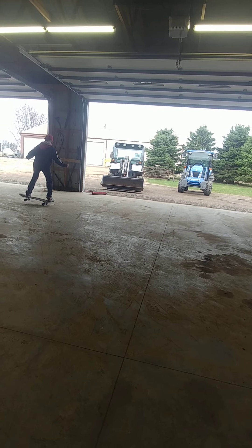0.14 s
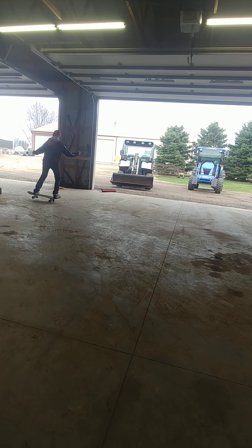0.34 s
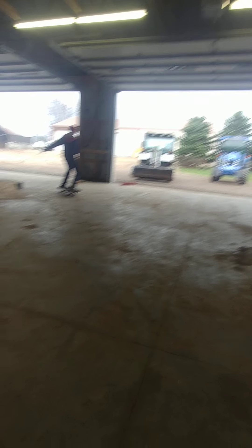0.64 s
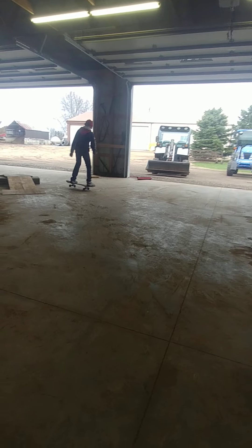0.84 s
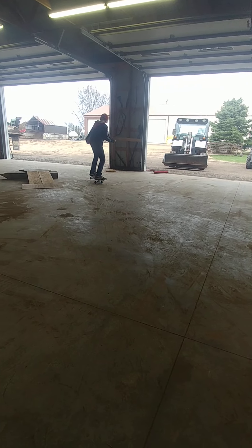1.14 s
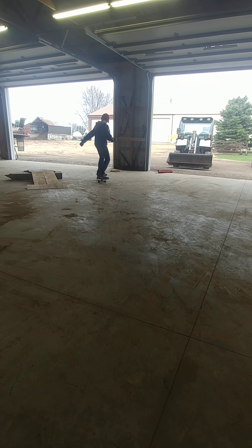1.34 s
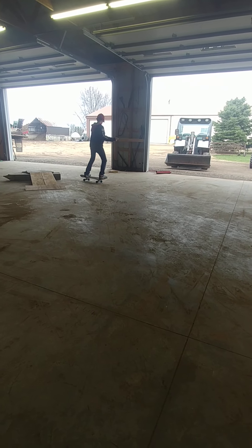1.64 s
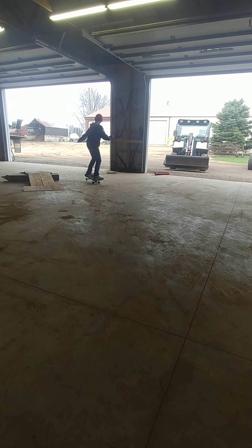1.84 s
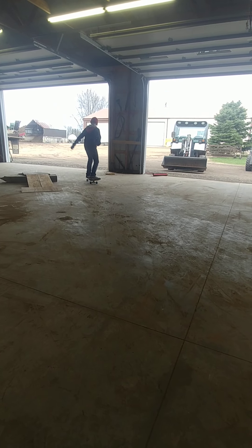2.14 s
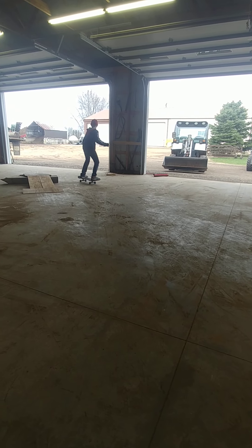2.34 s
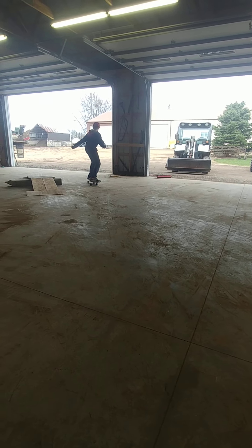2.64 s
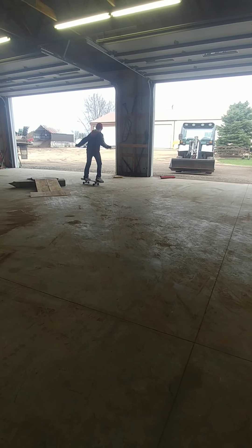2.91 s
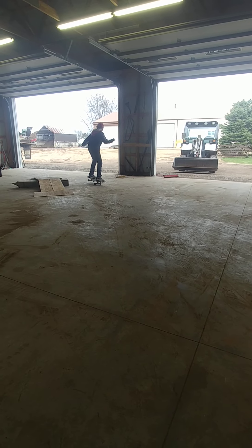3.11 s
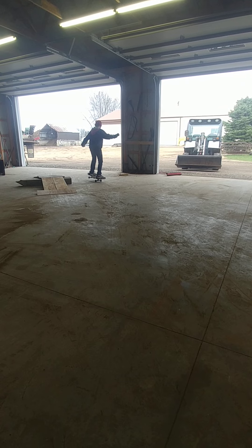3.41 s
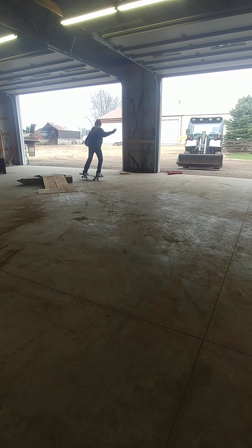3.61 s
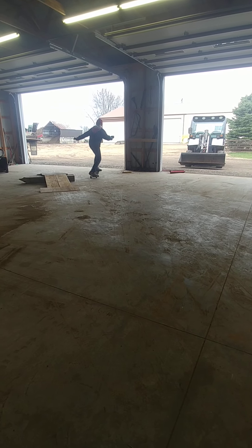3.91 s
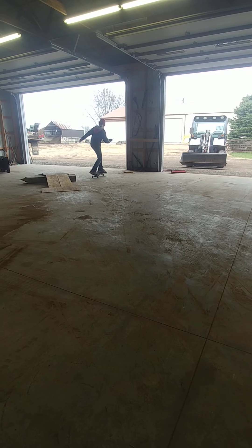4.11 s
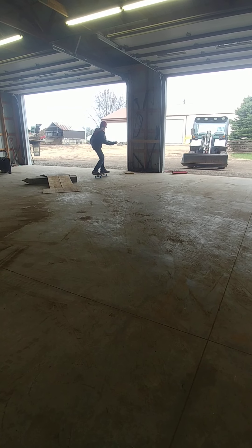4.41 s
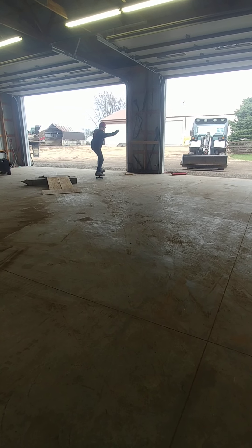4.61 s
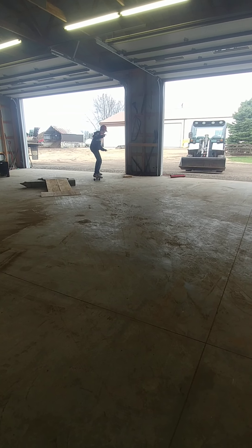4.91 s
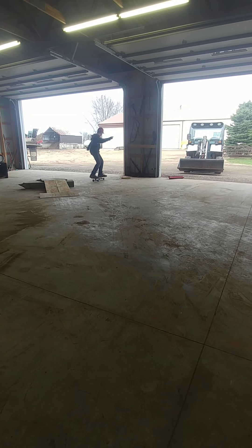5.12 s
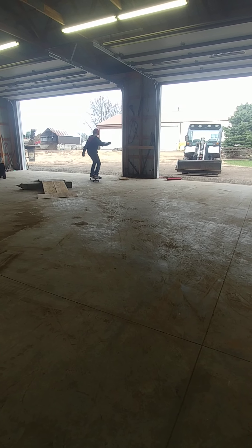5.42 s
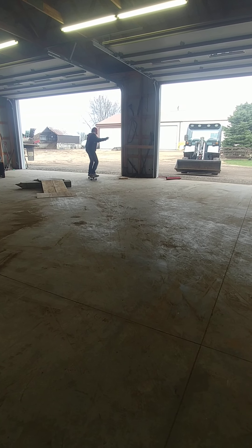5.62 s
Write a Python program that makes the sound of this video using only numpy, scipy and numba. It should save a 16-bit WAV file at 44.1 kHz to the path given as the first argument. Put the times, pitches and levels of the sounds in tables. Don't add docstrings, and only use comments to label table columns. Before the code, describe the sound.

Sharp, boomy skateboard landings on a concrete slab repeat fairly steadily, varying in force, some preceded by a light wheel scuff. Every knock bounces between floor and roof of a big shed and dies away in under a second. Gritty rolling and thin, high bearing squeaks appear mid-way; a pause follows the landing at 3.6 seconds, then looser knocks to the end. Distant phone stereo, slightly louder and brighter on the left, with soft hiss and low outdoor drone.

```python
import sys
import numpy as np
from scipy import signal
from scipy.fft import rfft, irfft, next_fast_len
from scipy.io import wavfile
from scipy.ndimage import uniform_filter1d
from numba import njit

SR = 44100
rng = np.random.default_rng(int(sys.argv[2]) if len(sys.argv) > 2 else 0)


def gain_from_db(level_db):
    decades = np.asarray(level_db, float) / 20
    return 10 ** decades


def store_wav(level_fs):
    pcm = np.round(np.clip(np.atleast_2d(level_fs), -1, 1) * 32767)
    wavfile.write(sys.argv[1], SR, pcm.T.astype(np.int16))


N = 253575
GRID_HZ = np.arange(2049) * SR / 4096 + 1


def shape_db(points):
    hz, db = np.transpose(points)
    return np.interp(np.log(GRID_HZ), np.log(hz), db)


def causal(gain):
    cepstrum = irfft(np.log(gain))
    cepstrum[1:2048] *= 2
    cepstrum[2049:] = 0
    return irfft(np.exp(rfft(cepstrum)))


def colour(x, points):
    return signal.fftconvolve(x, causal(gain_from_db(shape_db(points))))[:len(x)]


def unit(x):
    return x / np.sqrt(np.sum(x ** 2))


def noise(points):
    return unit(colour(rng.standard_normal(N), points)) * np.sqrt(N)


def curve(rows):
    return np.interp(np.arange(N) / SR, *np.transpose(rows))


def walk(rate_hz):
    hold = int(SR / rate_hz)
    steps = np.repeat(rng.standard_normal(N // hold + 1), hold)
    return 1.3 * uniform_filter1d(uniform_filter1d(steps, hold), hold)[:N]


def law(rule, *causes):
    return rule[0] + np.dot(rule[1:], causes)


def shift(modes, by_db):
    return [(hz, db + by_db, t60) for hz, db, t60 in modes]


def ring(modes):
    t = np.arange(4096) / SR
    sizes = gain_from_db(1.5 * rng.standard_normal(len(modes)))
    power = 0
    for size, (hz, db, t60) in zip(sizes, modes):
        tone = np.sin(2 * np.pi * hz * t) * gain_from_db(-60 * t / t60)
        power = power + abs(rfft(size * gain_from_db(db) * tone)) ** 2
    return power / power.mean()


RATTLE = [(17, .6), (29, .6), (47, .5)]


def rattle(x):
    for lag, gain in RATTLE:
        taps = np.r_[1, np.zeros(lag - 1), -gain]
        x = signal.lfilter(taps[::-1], taps, x)
    return x


# (frequency [Hz], level [dB], t60 [s])
SLAB = [(246, -0.5, 0.038), (313, 0, 0.049)]
# (frequency [Hz], t60 [s])
BOOM_MODE = (142, 0.076)
# (frequency [Hz], level [dB], t60 [s])
DECK_LOW = [(424, -23.5, 0.042), (524.7, 5, 0.022)]
DECK_HIGH = [(988, 2.8, 0.012), (1210, 3.8, 0.0082)]
# (frequency [Hz], level [dB], t60 [s])
TRUCKS = [(1480, 0, .014), (1890, 0, .014), (2220, -3, .012)]
TRUCKS_HIGH = [(2800, 2, .007), (3480, -2, .011), (4200, -5, .006)]
# (frequency [Hz], level [dB])
CLICK = [(800, -34), (2500, 3.5), (5000, 2), (7000, -2.5), (14000, 2)]
# (time [s], deck pitch [Hz], damping of the main note, so stronger side notes [dB])
FOOT = [(0, 835, -9.2), (.29, 670, 3), (.64, 812, -5), (.98, 812, -4.5), (1.291, 715, -10), (1.7, 796, 2),
        (2.0, 796, 4), (2.35, 760, -4), (2.65, 825, 1), (3.26, 855, -1), (3.6, 817, 1), (4.259, 838, 2.5),
        (4.8, 769, -3), (5.12, 780, -9), (5.47, 768, 1)]
# (level at weight 0 [dB], per weight [dB/dB], per time [dB/s])
BOOM_LAW = (4.5, 0.64, -3)
LOW_LAW = (5.24, 0.41, -2.51)
# (level [dB], per time [dB/s])
HIGH_LAW = (-7.5, 1.46)
# (level at slack 0 [dB], per slack [dB/dB], per time [dB/s])
UPPER_LAW = (-9.5, 1.1, 0.63)


def blow(s, deck_db, weight_db, slack_db, hard_db):
    when, pitch, damping = np.transpose(FOOT)
    deck_hz, damp_db = np.interp(s, when, pitch), np.interp(s, when, damping)
    boom_db = law(BOOM_LAW, weight_db, s)
    low_db = law(LOW_LAW, weight_db, s) + damp_db
    high_db = law(HIGH_LAW, s) + damp_db
    upper_db = min(law(UPPER_LAW, slack_db, s), 0)

    boom_hz, boom_t60 = BOOM_MODE
    slab_modes = SLAB + [(boom_hz, boom_db, boom_t60)]
    deck_modes = shift(DECK_LOW, low_db) + [(deck_hz, 0, .026)] + shift(DECK_HIGH, high_db)
    truck_modes = TRUCKS + shift(TRUCKS_HIGH, upper_db)

    slab_shape = shape_db([(50, -16.0), (110, -1.5), (400, -0.5), (900, -19.0)])
    deck_shape = shape_db([(120, -34), (380, -0.5), (1400, 6.0), (3000, -7.0)])
    truck_shape = shape_db([(400, -12), (1300, -1), (4500, -0.5), (8000, -22.5)])

    thump = ring(slab_modes) * gain_from_db(2 * slab_shape)
    deck = ring(deck_modes) * gain_from_db(2 * deck_shape)
    trucks = ring(truck_modes) * gain_from_db(2 * truck_shape)
    click = gain_from_db(2 * shape_db(CLICK))
    power = gain_from_db(2 * (deck_db + weight_db) - 7.0) * thump
    power += gain_from_db(2 * deck_db - 8.5) * deck
    power += gain_from_db(2 * (deck_db + slack_db) - 10.5) * trucks
    power += gain_from_db(2 * (deck_db + hard_db) + 11.5) * click
    return rattle(causal(np.sqrt(power)))


# (time [s], force [dB], rider's weight on the slab [dB], truck slack [dB], wheel hardness [dB])
LANDINGS = [(-.04, -30, -1.5, 5.5, -13.5), (0.287, -16.5, 5.5, -11.5, -16), (0.634, -14, -6, -15, -22.5),
            (0.65, -20.5, -3, -9, -23), (0.976, -21, -0.5, 2, -6.5), (1.288, -8.5, -13.5, 0, -19.5),
            (1.696, -16, -1.5, 2, -14), (1.998, -18, -9.5, 1, -25.5), (2.007, -16.5, -6.2, 8, -10),
            (2.346, -25, -1, -3, -15.5), (2.65, -17.5, -1.2, 3.5, -17), (2.987, -32.5, 2, -4, -11),
            (3.261, -21.5, -4, 0, -17.5), (3.62, -16, -4, 1, -4.5), (4.182, -39.5, -8, 1.3, -20),
            (4.256, -34.5, -4, -4.5, -31), (4.796, -15.5, -4.5, 2.5, -10), (5.119, -35.5, -3, 10, -9.5),
            (5.468, -25.5, -2.5, -4.5, -12.5)]
# (level at hardness 0 [dB], per hardness [dB/dB])
DIRECT_LAW = (29, .07)


def landings():
    return [(row[0], blow(*row), law(DIRECT_LAW, row[-1])) for row in LANDINGS]


def arrival():
    t = np.arange(256) / SR
    soft = np.exp(-2 * np.pi * 3000 * t)
    grit = np.diff(rng.standard_normal(len(t) + 1)) * np.exp(-t / .001)
    return soft / soft.sum() + gain_from_db(-2.5) * unit(grit)


# (centre [Hz], decay [dB/s], steepening [dB/s^2], left-right likeness [0-1])
SHED = [(91.5, 98, 14.5, 0.94), (183, 105, 19, 0.99), (350, 77.5, 24, 0.82), (700, 55.5, 62.5, 0),
        (1448, 73.5, 64.5, 0.16), (2800, 66, 102, 0.3), (5900, 81, 123.5, 0), (8900, 128.5, 106, 0.06),
        (13000, 197.5, 51.5, .3)]


def shed_bands(size):
    spectra = rfft(rng.standard_normal((2, size)))
    where = np.log(np.arange(spectra.shape[1]) * SR / size + 1)
    centres = np.log(np.array(SHED)[:, 0])
    bands = []
    for k, (hz, _, _, likeness) in enumerate(SHED):
        band_gain = np.interp(where, centres, np.arange(len(SHED)) == k)
        left, other = irfft(spectra * band_gain, size)
        alike = np.clip(likeness, 0, 1)
        late = np.roll(left, 22 * (hz > 500))
        bands.append([left, alike * late + np.sqrt(1 - alike ** 2) * other])
    return np.array(bands)


# (delay [s], level [dB], left lead [s])
ARRIVALS = [(.004, 12, .0005), (.0085, 14, .0003), (.0135, 19, 0), (.0265, 21, -.0002), (.044, 18, .0002)]
FLOOR_MIRROR = np.array([1, 0, 0, 0, 0, 0, .85]) / 1.85


def shed(strikes):
    size, lead = int(.9 * SR), SR // 10
    bands = shed_bands(size=next_fast_len(N + 2 * size))
    t = np.arange(size) / SR
    _, decay, steepening, _ = np.transpose(SHED)
    build_up = 1 - np.exp(-(t / .012) ** 2)
    fall = gain_from_db(-np.outer(decay, t) - np.outer(steepening, t ** 2)) * build_up
    bounces = [(k * .0176, 24.5 - (k - 1) * 3.5, .0005) for k in range(1, 7)]
    out = np.zeros((2, N + lead + 2 * size))
    for s, sound, direct_db in strikes:
        i = int(s * SR) + lead
        reply = np.einsum("bt,bct->ct", fall, bands[:, :, i:i + size])
        direct = (.00051, direct_db, .00055)
        for delay, db, left_lead in [direct] + ARRIVALS + bounces:
            echo = gain_from_db(db) * (arrival() if delay > .001 else FLOOR_MIRROR)
            for side, lag in enumerate([.001 - left_lead, .001]):
                j = int((delay + lag) * SR)
                reply[side, j:j + len(echo)] += echo
        heard = signal.fftconvolve(reply, sound[None], axes=1)
        out[:, i:i + heard.shape[1]] += heard
    start = lead + 40
    return out[:, start:start + N]


# (time [s], level [dB])
RUMBLE = [(0, -57), (1, -51), (2, -49.5), (3, -51.5), (4, -55), (4.5, -57.5), (5, -52), (5.75, -56)]
# (frequency [Hz], level [dB])
RUMBLE_SHAPE = [(25, -33.5), (45, -14), (62, -2.5), (88, 3.5), (115, -15), (170, -11.5), (400, -21.5),
                (1200, -51), (3000, -67.5)]


def rumble():
    mid, side = noise(RUMBLE_SHAPE), noise(RUMBLE_SHAPE)
    level = gain_from_db(curve(RUMBLE) + 0.81 * walk(6.9))
    return level * (mid + .15 * side * np.array([[1], [-1]]))


# (level at hardness 0 [dB], per hardness [dB/dB])
BRUSH_TRUCKS = (0, 0.76)
BRUSH_CLICK = (-14.5, 0.84)


def touch(s, force_db, weight_db, hard_db):
    scuff = rng.standard_normal(600) * np.exp(-np.arange(600) / (.002 * SR))
    slack_db, click_db = law(BRUSH_TRUCKS, hard_db), law(BRUSH_CLICK, hard_db)
    return signal.fftconvolve(blow(s, force_db, weight_db, slack_db, click_db), unit(scuff))


# (time [s], force [dB], weight [dB], hardness [dB])
TOUCHES = [(.279, -48.5, 16.5, -9), (.958, -27.5, 5.5, -17.5), (1.669, -43, 3, 5.5),
           (1.688, -35.5, 10.5, -15), (2.644, -24, -3.5, -17), (3.238, -33, -1, -6),
           (3.245, -32.5, 3.5, -5.5), (3.603, -39.5, 11, 17.5), (3.608, -42, 6, -2), (3.612, -44, 10, 16),
           (4.177, -55, 10.5, -16), (4.779, -30, -12, -1), (4.791, -36, -6.5, -4), (5.457, -55, 17, 14)]


def touches():
    return [(row[0], touch(*row), 25.5) for row in TOUCHES]


# (time [s], level [dB])
ROLL = [(0, -101), (1.4, -42), (1.65, -46), (2.3, -34), (2.55, -57), (2.9, -70), (3.2, -64), (4.5, -70),
        (5.08, -42), (5.4, -77), (5.75, -74)]
# (frequency [Hz], level [dB])
GRIT = [(150, -37), (400, -1), (800, -8), (1500, 1), (2500, -7), (4000, -48), (7000, -50.5), (10000, -37.5)]


def rolling():
    sides = [gain_from_db(2.5 * walk(14)) * noise(GRIT) for _ in range(2)]
    return gain_from_db(curve(ROLL) - 5) * np.array(sides)


# (start [s], end [s], first pitch [Hz], last pitch [Hz], level [dB])
SQUEAKS = [
    (1.52, 1.69, 6100, 6100, -72),
    (1.86, 1.96, 6000, 6000, -68),
    (2.17, 2.46, 6500, 6600, -61),
    (2.36, 2.62, 6800, 8200, -62),
    (2.87, 3.2, 3500, 3450, -64),
    (3.42, 3.62, 6450, 6600, -64),
]


def squeaks():
    t, out = np.arange(N) / SR, np.zeros((2, N))
    for start, end, first_hz, last_hz, db in SQUEAKS:
        along = np.clip((t - start) / (end - start), 0, 1)
        glide_hz = first_hz + (last_hz - first_hz) * along
        for side in range(2):
            phase = 2 * np.pi * np.cumsum(glide_hz * (1 + .018 * walk(400))) / SR
            out[side] += gain_from_db(db + 5 * walk(60)) * np.sin(np.pi * along) * np.sin(phase)
    return out


def scene():
    return shed(landings() + touches()) + rolling() + squeaks() + rumble()


@njit
def limiter(x, top, release):
    y, envelope = np.empty_like(x), 0.
    for i in range(x.shape[1]):
        envelope = max(abs(x[0, min(i + 32, x.shape[1] - 1)]), envelope * release)
        y[:, i] = x[:, i] * min(1., top / (envelope + 1e-9))
    return y


def top_cut(x):
    return signal.sosfilt(signal.butter(12, 16510, fs=SR, output="sos"), x)


# (frequency [Hz], level [dB])
MIC = [(28, -23), (50, 1.5), (90, 3.5), (2200, -1), (4000, -7.5), (6500, -2.5), (8300, -11), (9600, -24),
       (10600, -36.5), (11800, -31), (13300, -31.5), (14500, -43.5), (16200, -29.5), (17000, -46)]
# (frequency [Hz], level [dB])
LEFT_OVER_RIGHT = [(60, 2), (200, 6.5), (380, 1.3), (700, 10.4), (1290, 4.65), (2380, 4.5), (4400, 9.3),
                   (7000, 12.8), (9500, 4.4), (13000, 30), (16000, 4.6)]
# (frequency [Hz], level [dB])
HISS = [(200, 0), (2000, -4), (5000, -5.5), (8000, -10), (10500, -16), (13000, -9.5), (16000, -15.5)]


def record(dry):
    left = colour(colour(dry[0], MIC), [(hz, db / 2) for hz, db in LEFT_OVER_RIGHT])
    right = colour(colour(dry[1], MIC), [(hz, -db / 2) for hz, db in LEFT_OVER_RIGHT])
    hiss = gain_from_db(-69) * np.array([noise(HISS), noise(HISS)])
    release_s = .04
    held = limiter(np.array([left, right]) + hiss, .97, np.exp(-1 / (release_s * SR)))
    treble_cut = signal.ellip(8, .2, 70, 15900, fs=SR, output="sos")
    mix = np.clip(signal.sosfilt(treble_cut, held), -1, 1)
    return top_cut(mix)


dry = scene()
out = record(dry)
store_wav(out)
```